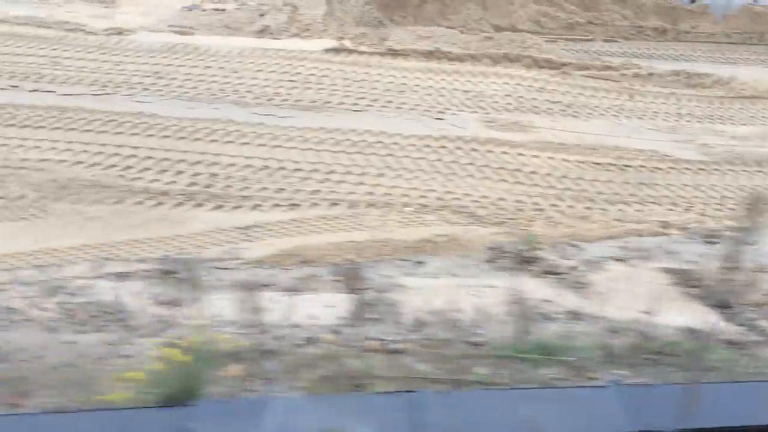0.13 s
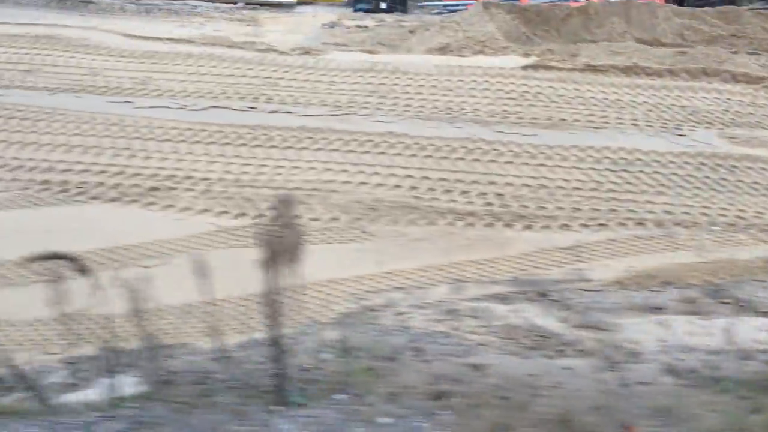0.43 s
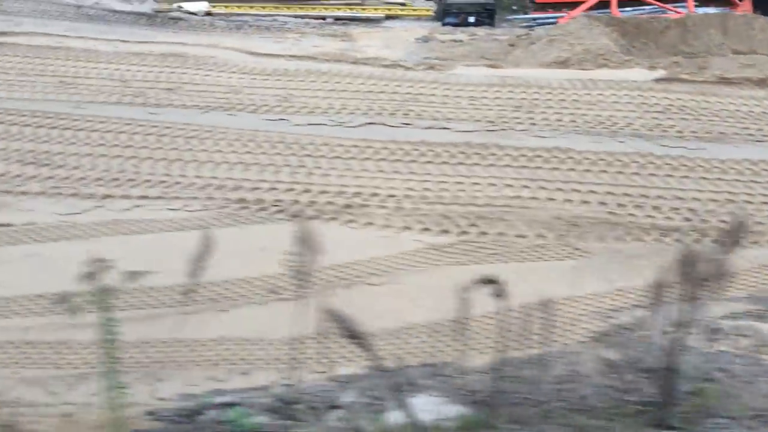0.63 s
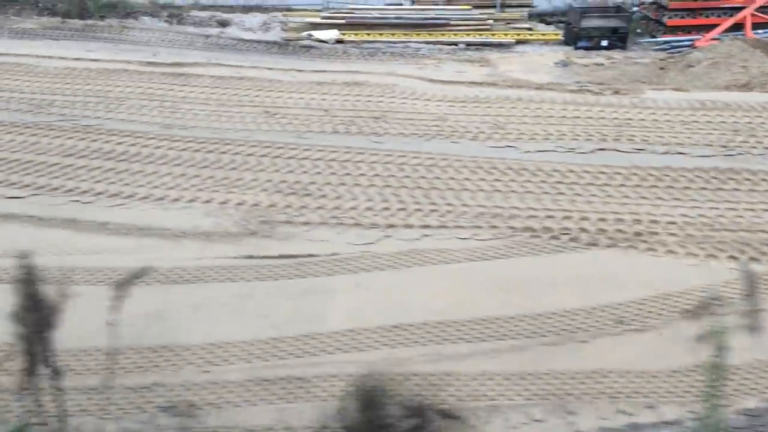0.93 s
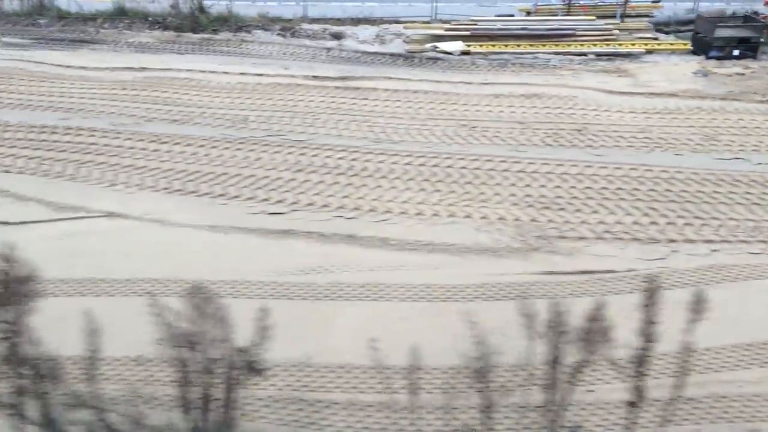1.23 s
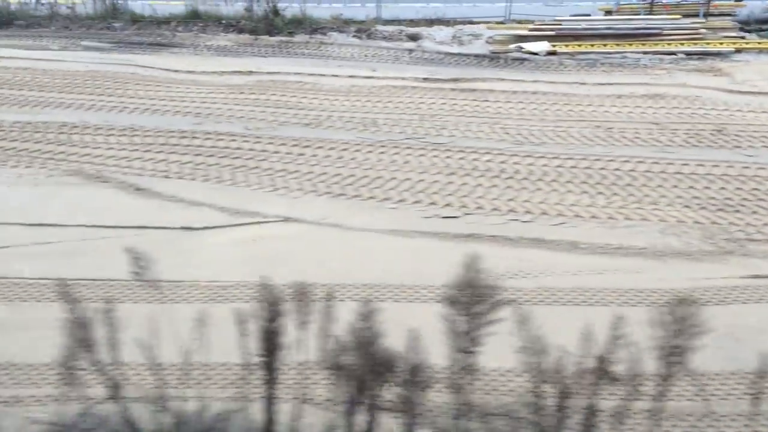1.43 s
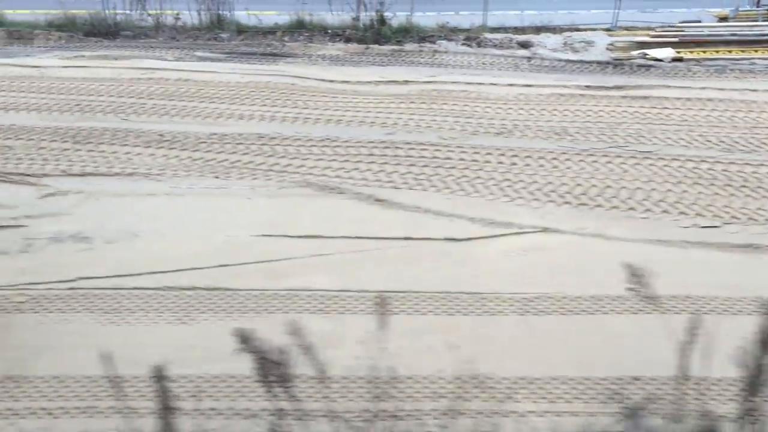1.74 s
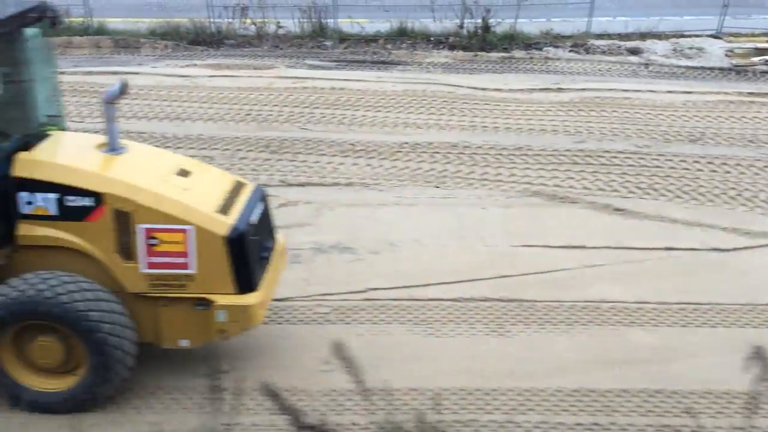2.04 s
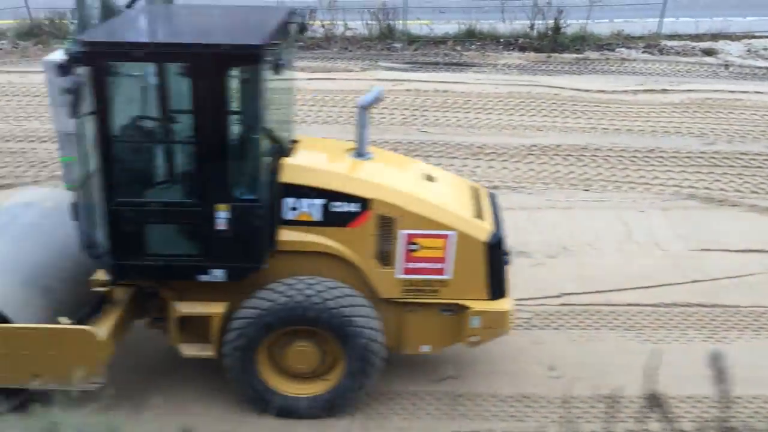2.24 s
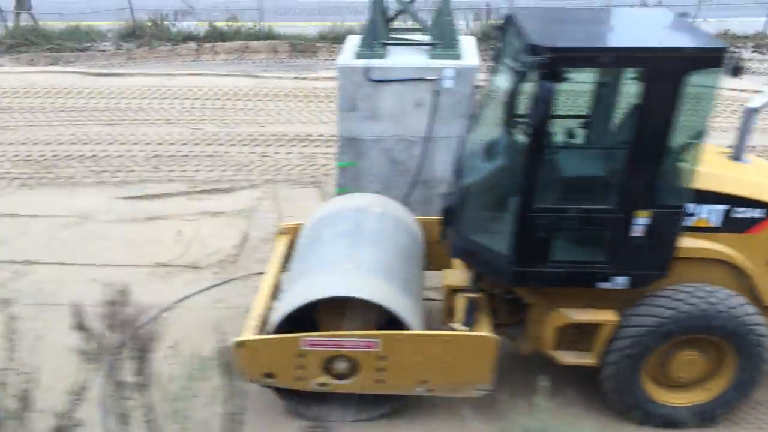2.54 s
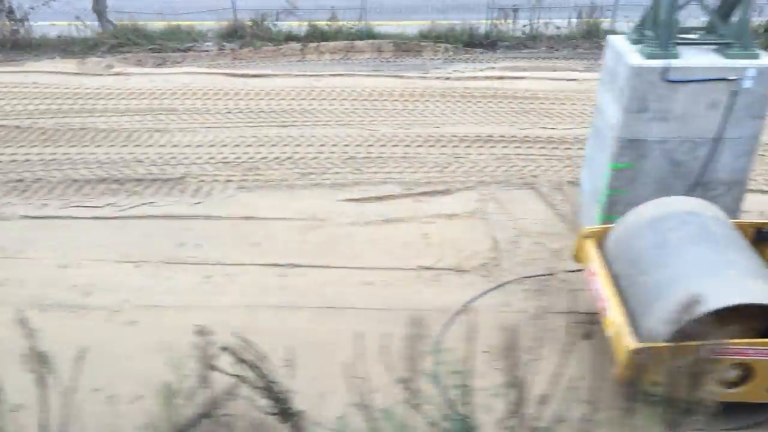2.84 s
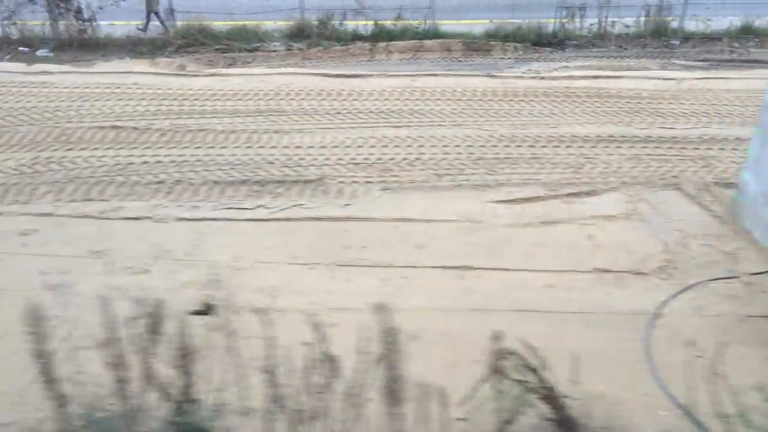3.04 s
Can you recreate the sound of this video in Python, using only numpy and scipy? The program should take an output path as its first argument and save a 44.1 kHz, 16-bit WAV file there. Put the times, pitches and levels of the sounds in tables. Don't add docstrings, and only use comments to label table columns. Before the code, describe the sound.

Train carriage interior rumbling along rough track, steel scraping into a loud bang, then loose fittings clacking

```python
import sys
import numpy as np
from scipy import signal
from scipy.io import wavfile
from scipy.ndimage import uniform_filter1d

SR = 44100
rng = np.random.default_rng(int(sys.argv[2]) if len(sys.argv) > 2 else 0)


def volts(x):
    e = np.asarray(x, float) / 20
    return 10 ** e


def bounce(signal):
    frames = np.transpose(np.atleast_2d(signal))
    limited = np.clip(frames, -1, 1)
    pcm = np.round(limited * 32767).astype(np.int16)
    wavfile.write(sys.argv[1], SR, pcm)


N = 141120
T = np.arange(N) / SR


def evened(x):
    return x / np.sqrt(np.mean(x ** 2) + 1e-20)


def steadied(x, share, seconds):
    level = np.sqrt(abs(uniform_filter1d(x ** 2, size=int(seconds * SR))) + 1e-9)
    return evened(x / level ** share)


def shape(start, hold, t60, rise):
    attack = np.clip((T - start) / rise, 0, 1)
    time_after_hold = np.clip(T - start - hold, 0, None)
    return attack * volts(-60 * time_after_hold / t60)


def noise(points, size, patchy_db=0., flicker_db=0., tilt_db=0., edge_db=30):
    frames = 4 * N // size + 5
    hz = np.fft.rfftfreq(size, 1 / SR) + 1
    real, imag, patch = rng.standard_normal((frames, len(hz), 3)).T
    patch = uniform_filter1d(patch, size=size // 100 + 1, axis=0)
    patch = evened(uniform_filter1d(patch, size=8192 // size, axis=1))
    flicker = evened(uniform_filter1d(rng.standard_normal(frames), size=3))
    point_hz, point_db = np.transpose(points)
    colour = np.interp(np.log(hz), np.log(point_hz), point_db) + tilt_db * np.log2(hz / 3000)
    octaves_below = np.maximum(np.log2(point_hz[0] / hz), 0)
    octaves_above = np.maximum(np.log2(hz / point_hz[-1]), 0)
    colour -= edge_db * (octaves_below + octaves_above)
    spectra = (real + 1j * imag) * volts(colour[:, None] + patchy_db * patch + flicker_db * flicker)
    return evened(signal.istft(spectra, nperseg=size, noverlap=3 * size // 4)[1][:N])


def resonate(x, hz, width):
    turn = np.exp(2j * np.pi * hz * T)
    r = np.exp(-np.pi * width / SR)
    return 2 * (turn * signal.lfilter([1 - r], [1, -r], x / turn)).real


STEADY, STEADY_S = .4, .09

# pitch in Hz, level in dB per Hz.
BOOM_COLOUR = [(12, -63), (20, -19), (41, -8), (134, -5), (220, -17.5), (255, -12), (292, -21.5),
               (461, -21), (500, -24), (650, -36), (1100, -120)]
# pitch in Hz, level in dB per Hz.
ROAR_COLOUR = [(180, -29.5), (300, -17), (460, -5), (588, -3), (671, -5.5), (1250, -9.5), (3250, -27),
               (5150, -38), (15200, -54.5)]
# time in seconds, level in dB.
TRACK_ROUGHNESS = [(.08, .5), (.3, .5), (.45, 1.5), (.6, 1), (.8, 0), (.95, 1), (1.0, 0), (1.2, -1),
                   (1.27, -4), (1.36, -3), (1.5, 0), (1.95, .5), (2.2, 0), (2.35, -2), (2.5, 1), (2.75, 0),
                   (2.95, 1), (3.2, 0)]
# pitch in Hz, width in Hz, level in dB.
CABIN_PANELS = [(121.8, 25, -37), (163.7, 19.4, -36.5), (192.6, 14.4, -38.5), (262.8, 46, -50),
                (367, 26, -52), (473, 34, -59), (618, 32, -59)]


def rumble():
    track_db = np.interp(T, *np.transpose(TRACK_ROUGHNESS))
    slow = signal.butter(2, 48, fs=SR, output="sos")
    lumps = np.tanh(evened(signal.sosfilt(slow, rng.standard_normal(N))))
    shake = rng.standard_normal(N)
    panels = np.zeros(N)
    for hz, width, db in CABIN_PANELS:
        panels += volts(db) * evened(resonate(resonate(shake, hz, width), hz, width))
    boom = volts(-33.5) * noise(BOOM_COLOUR, size=4096, patchy_db=0.75) + panels
    boom = np.std(boom) * steadied(boom, STEADY, STEADY_S)
    roar = volts(-43.5) * noise(ROAR_COLOUR, size=512, patchy_db=1.0, flicker_db=0.4, edge_db=0)
    return boom * volts(track_db + 2.6 * lumps) + roar * volts(track_db + 0.13 * lumps)


# start in seconds, hold in seconds, time to fade by 60 dB in seconds,
# level in dB, tilt in dB per octave.
SCRAPES = [
    (0.035, 0.056, 3.3, -58, 3),
    (0.855, 0.36, 0.46, -41.5, -2),
    (2.862, .03, 11, -65.5, 5),
]
# pitch in Hz, level in dB per Hz.
HISS_COLOUR = [(900, -13), (1300, -9), (2500, -10), (3600, -16.5), (4650, -20), (5200, -17), (9000, -22),
               (15200, -31)]


def scrapes():
    rise_s, sag_db_per_s = .035, -14
    out = np.zeros(N)
    for start, hold, t60, db, tilt in SCRAPES:
        hiss = noise(HISS_COLOUR, size=1024, patchy_db=.9, tilt_db=tilt, edge_db=10)
        sag_db = sag_db_per_s * np.clip(T - start, 0, hold)
        out += volts(db + sag_db) * shape(start, hold, t60, rise_s) * hiss
    return out


def ringing(rows, width_share, fuzz):
    out = np.zeros(N)
    for start, hold, t60, hz, db in rows:
        width = width_share * hz
        rub = resonate(resonate(rng.standard_normal(N), hz, width), hz, width)
        rub = steadied(rub, STEADY, STEADY_S)
        tone = np.sqrt(2) * np.sin(2 * np.pi * (hz * T + rng.random()))
        mix = fuzz * rub + np.sqrt(1 - fuzz ** 2) * tone
        out += volts(db) * shape(start, hold, t60, rise=.008) * mix
    return out


# start in seconds, hold in seconds,
# time to fade by 60 dB in seconds, pitch in Hz, level in dB.
SINGING_TONES = [(0.083, 0.42, .6, 3120, -66), (.1, 0.08, 0.62, 5040, -65), (.1, 0.15, .4, 6830, -67),
                 (0.097, 0.23, 0.94, 9350, -71.5), (0.892, 0.2, .2, 5230, -52.5),
                 (.9, 0.16, .2, 4140, -55.5), (.88, 0.26, 0.22, 6170, -62), (.87, .3, .2, 6900, -65),
                 (.95, 0.021, 0.098, 1230, -48), (1.125, 0.1, 0.37, 5180, -52.5),
                 (1.27, 0.073, 1, 5140, -67.5), (1.132, .03, 0.37, 3125, -49),
                 (1.19, 0.023, 0.22, 1830, -46.5), (1.1, .12, 0.26, 10400, -68), (1.3, .75, .4, 7820, -79),
                 (1.548, .4, .3, 9800, -82), (1.935, .035, .05, 7260, -74), (2.89, .3, .3, 7230, -72),
                 (2.89, .3, .3, 8570, -73), (2.9, 0.28, .3, 9340, -73.5), (2.9, 0.26, .3, 2390, -60),
                 (3.08, 0.13, .3, 5070, -73)]


def singing():
    return ringing(SINGING_TONES, width_share=.042, fuzz=.96)


# start in seconds, hold in seconds, time to fade by 60 dB in seconds,
# pitch in Hz, level in dB.
THUMPS = [
    (.14, .008, .08, 125, -22),
    (1.008, .026, .04, 128, -10.5),
    (1.02, .02, .12, 48, -22),
    (1.092, .015, .08, 80, -19),
    (1.145, .01, .1, 75, -24),
    (2.478, .025, .1, 125, -25),
]


def thumps():
    out = np.zeros(N)
    for start, hold, t60, hz, db in THUMPS:
        swing = np.sqrt(2) * np.sin(2 * np.pi * hz * (T - start))
        out += volts(db) * shape(start, hold, t60, rise=0.017) * swing
    return out


# start in seconds, hold in seconds,
# time to fade by 60 dB in seconds, level in dB, tilt in dB per octave.
RATTLES = [
    (0.382, 0.011, 0.065, -40, -19),
    (0.443, 0.023, 0.22, -40.5, -0.5),
    (1.561, 0.012, 0.082, -48, 3),
    (2.346, 0.062, 0.13, -47, 4),
    (2.415, .02, 0.17, -33, 2),
    (2.455, 0.018, 0.22, -36, 1.5),
]
# pitch in Hz, level in dB per Hz.
RATTLE_COLOUR = [(350, -46), (600, -2), (1040, -8.5), (1130, -5), (1280, -10), (1490, -14), (2480, -19.5),
                 (15200, -76)]


def rattles():
    out = np.zeros(N)
    for start, hold, t60, db, tilt in RATTLES:
        clatter = noise(RATTLE_COLOUR, size=256, patchy_db=2.5, flicker_db=0.4, tilt_db=tilt)
        out += volts(db) * shape(start, hold, t60, rise=.008) * clatter
    return out


# start in seconds, hold in seconds,
# time to fade by 60 dB in seconds, pitch in Hz, level in dB.
CLACKS = [
    (2.343, .019, .03, 1350, -37),
    (2.42, .046, .04, 1280, -34),
    (2.428, .03, .07, 1050, -35),
    (2.47, .03, .1, 980, -42),
    (.97, .046, .03, 1480, -38),
    (.87, .025, .15, 2490, -44),
]


def clacks():
    return ringing(CLACKS, width_share=.08, fuzz=.85)


BLOW_RISE_S = .02

# start in seconds, hold in seconds,
# time to fade by 60 dB in seconds, level in dB, tilt in dB per octave.
BLOWS = [
    (1.02, .035, .13, -28.5, 3),
    (1.026, .05, .22, -23, -1),
    (1.19, .03, .15, -42, 0),
]
# pitch in Hz, level in dB per Hz.
CRASH_COLOUR = [(120, -37.5), (200, 0.5), (364, -22), (638, -4.5), (934, -2.5), (1640, -5.5), (2070, -20),
                (3150, -22.5), (15200, -56.5)]
# pitch in Hz, width in Hz, level in dB.
BODY_MODES = [(465, 12, -7), (583, 46, 5), (1380, 110, -11), (1740, 20, -9.5), (1870, 50, -9.5),
              (2220, 140, -3.5), (3180, 29, -14.5), (3800, 48, -37)]


def blows():
    out = np.zeros(N)
    for start, hold, t60, db, tilt in BLOWS:
        crash = noise(CRASH_COLOUR, size=256, patchy_db=2.6, flicker_db=2.6, tilt_db=tilt, edge_db=8)
        ring = np.zeros(N)
        for hz, width, mode_db in BODY_MODES:
            ring += volts(mode_db) * evened(resonate(crash, hz, width + 20))
        out += volts(db) * shape(start, hold, t60, BLOW_RISE_S) * (crash + volts(-2) * evened(ring))
    return out


# start in seconds, hold in seconds,
# time to fade by 60 dB in seconds, level in dB.
SHUDDER = (1.03, .085, .1, -17.5)


def shudder():
    start, hold, t60, db = SHUDDER
    boom = steadied(noise(BOOM_COLOUR, size=1024, tilt_db=-.5), 2 * STEADY, STEADY_S / 2)
    return volts(db) * shape(start, hold, t60, BLOW_RISE_S) * boom


def scene():
    rolling = rumble() + scrapes() + singing()
    fittings = rattles() + clacks()
    bang = thumps() + blows() + shudder()
    return (rolling + fittings + bang)[None]


def low_pass(x):
    return signal.sosfilt(signal.butter(12, 15380, fs=SR, output="sos"), x)


def record(dry):
    start_s = .0838
    duck_from_db, duck_share, recover_db_per_s = -27, .15, 14
    power_db = 10 * np.log10(abs(uniform_filter1d(dry[0] ** 2, size=2000)) + 1e-12)
    fall_db = T * recover_db_per_s
    peak_db = np.maximum.accumulate(power_db + fall_db) - fall_db
    over_db = np.maximum(peak_db - duck_from_db, 0)
    low_cut = signal.butter(2, 38, "high", fs=SR, output="sos")
    high_cut = signal.firwin(511, 15330, window=("kaiser", 9), fs=SR)
    mic = signal.sosfilt(low_cut, dry)
    mic = signal.oaconvolve(mic, high_cut[None], "same")
    ducked = mic / volts(duck_share * uniform_filter1d(over_db, size=800))
    return low_pass(ducked * (T > start_s))


dry = scene()
out = record(dry)
bounce(out)
```